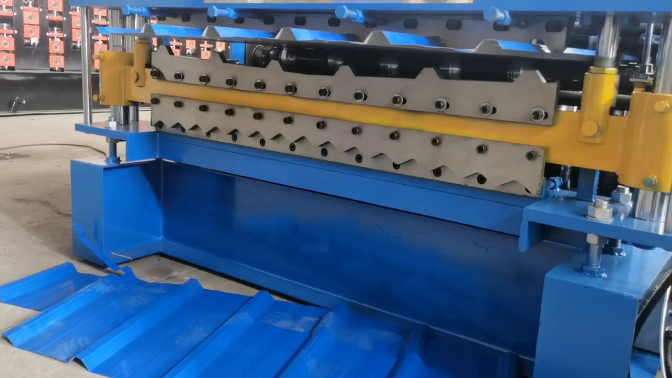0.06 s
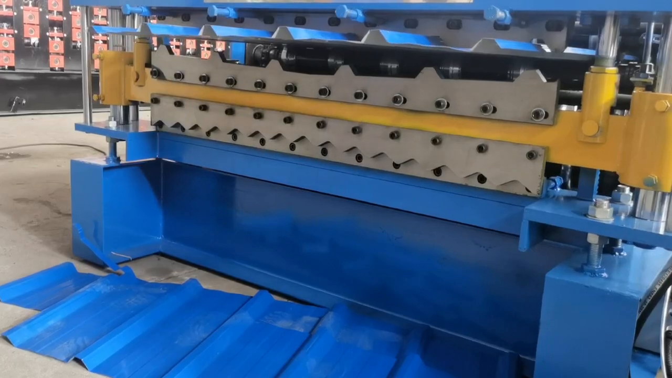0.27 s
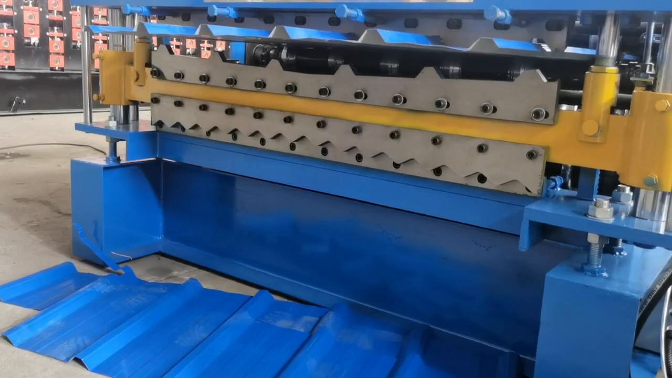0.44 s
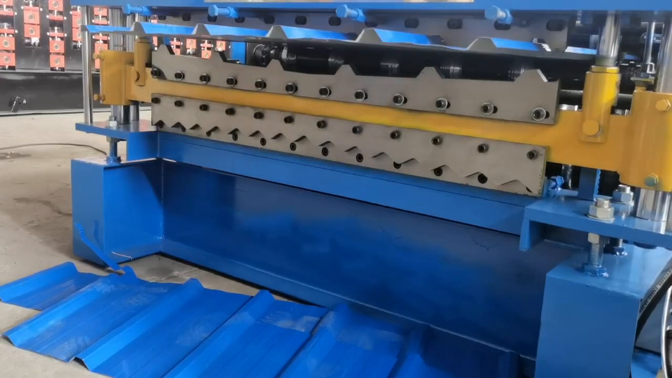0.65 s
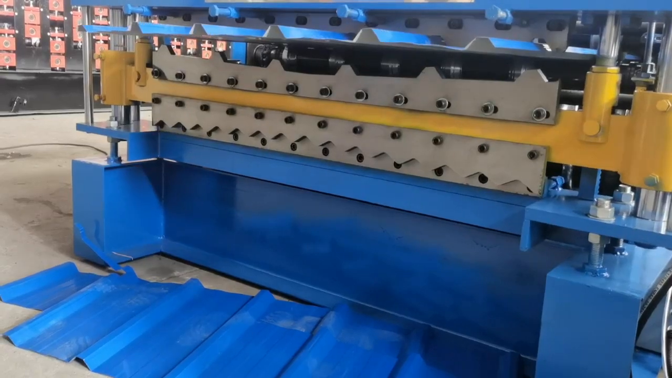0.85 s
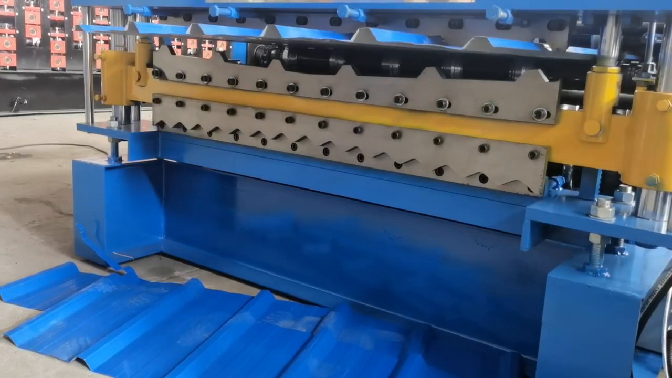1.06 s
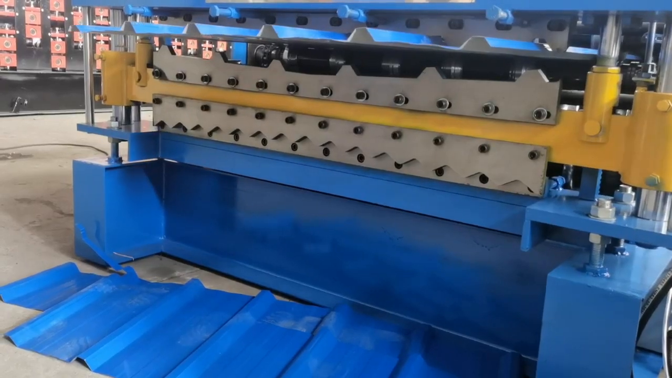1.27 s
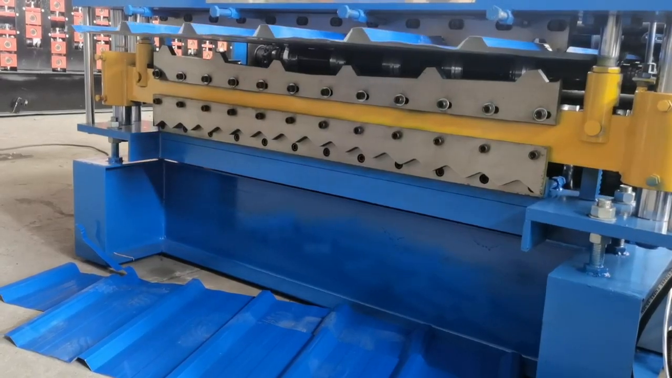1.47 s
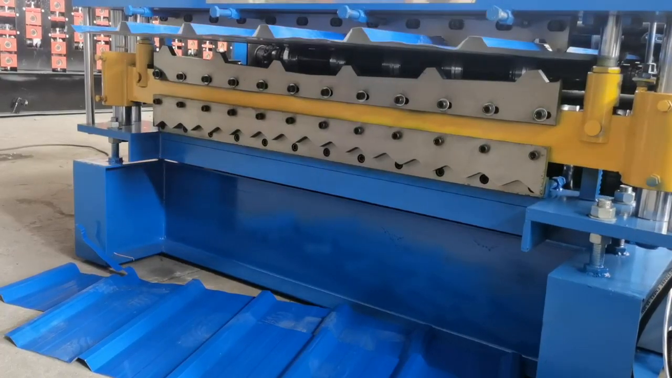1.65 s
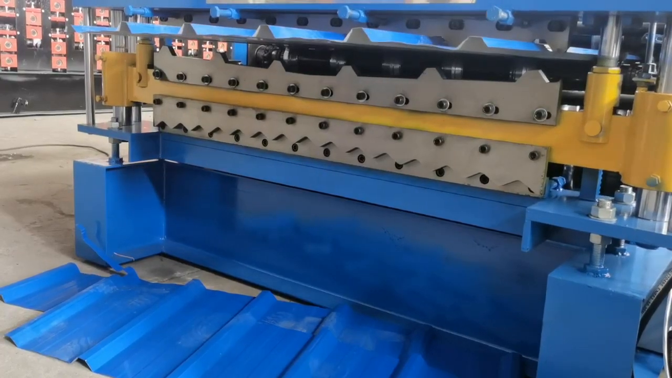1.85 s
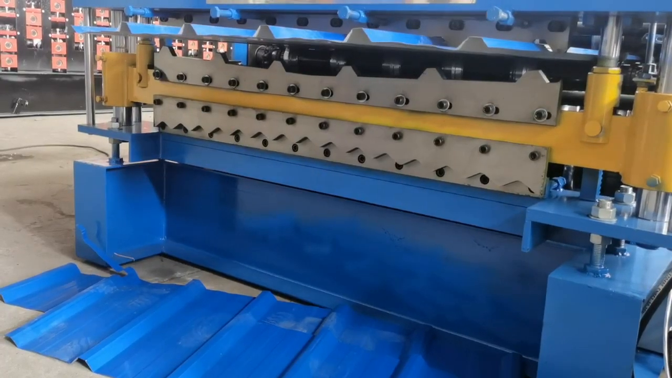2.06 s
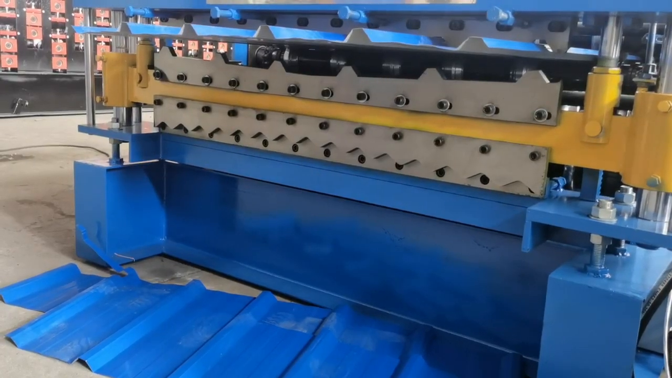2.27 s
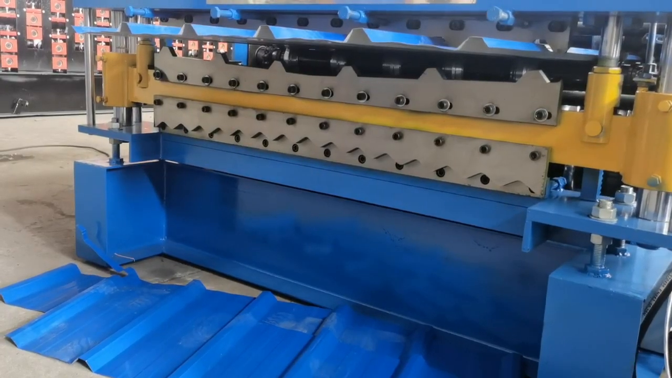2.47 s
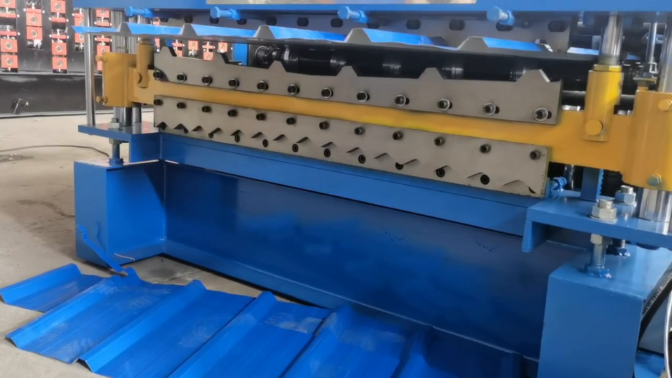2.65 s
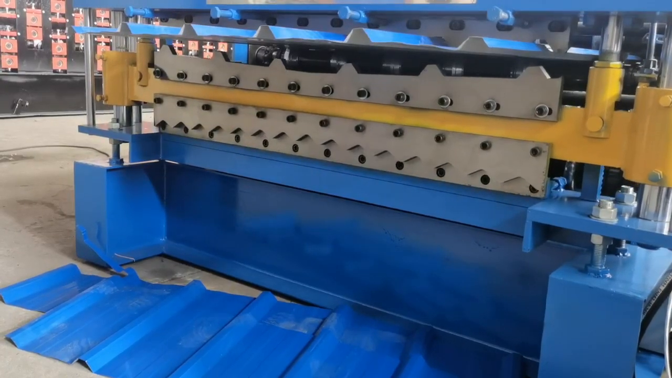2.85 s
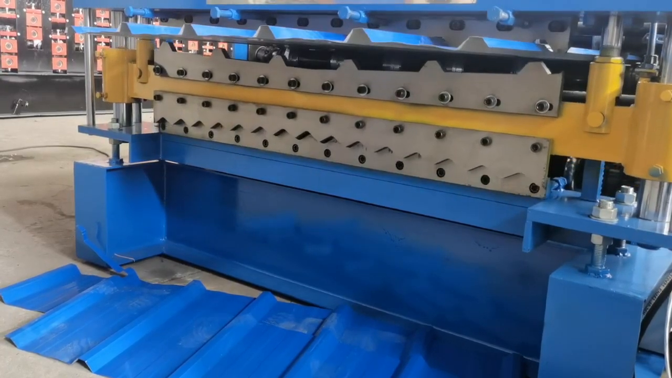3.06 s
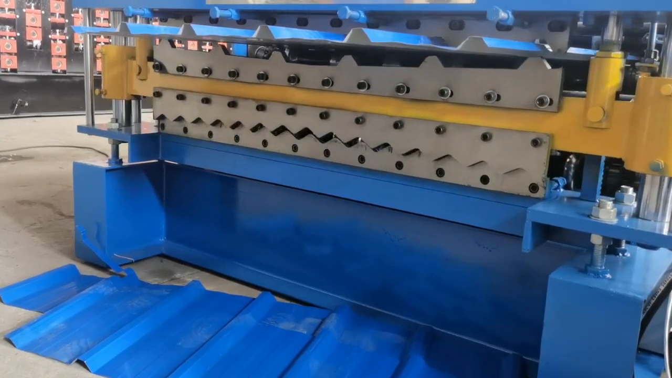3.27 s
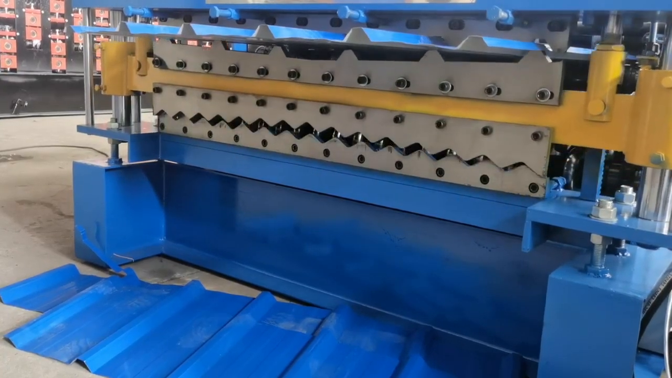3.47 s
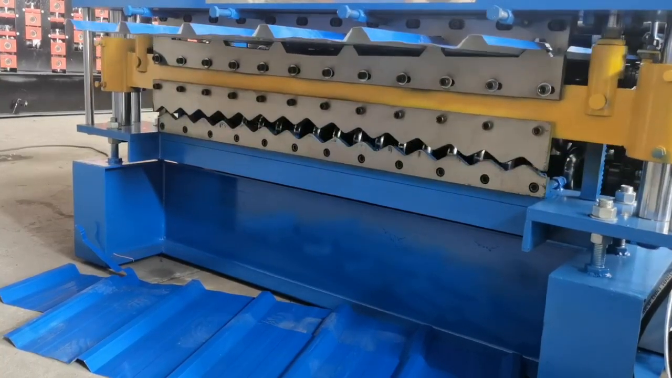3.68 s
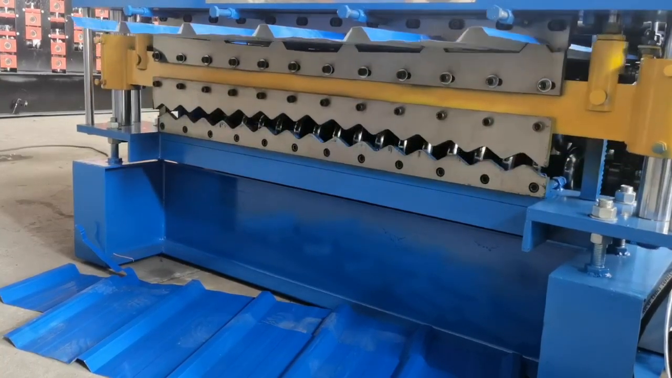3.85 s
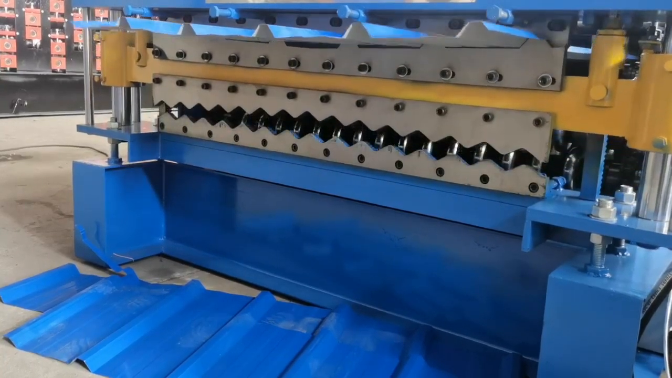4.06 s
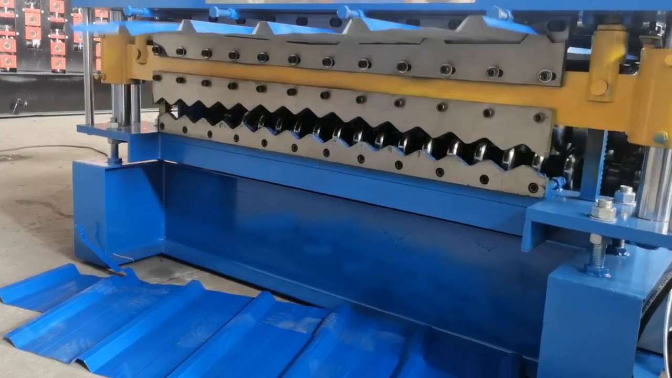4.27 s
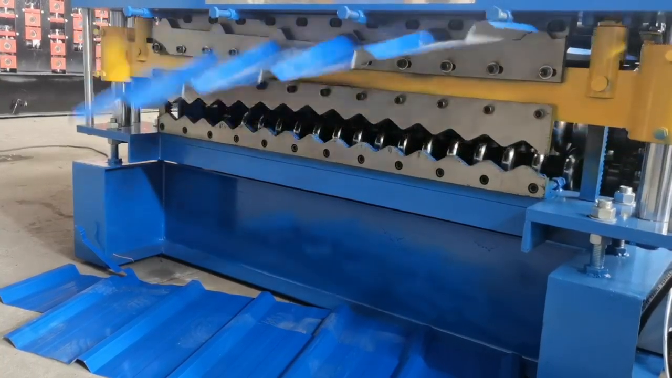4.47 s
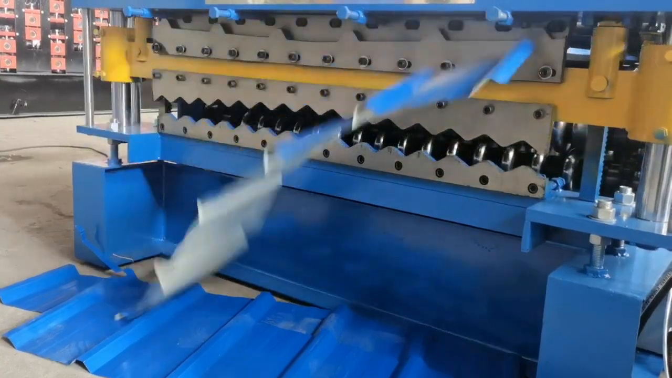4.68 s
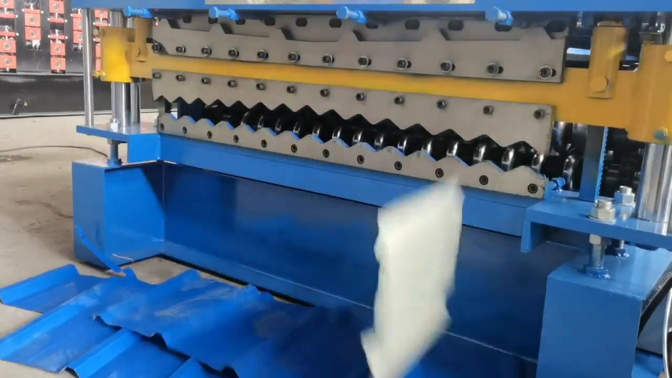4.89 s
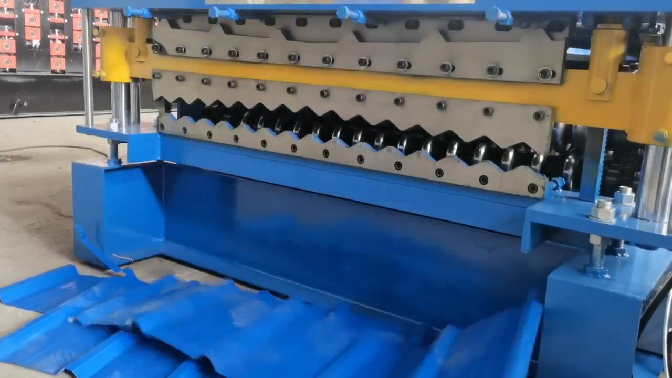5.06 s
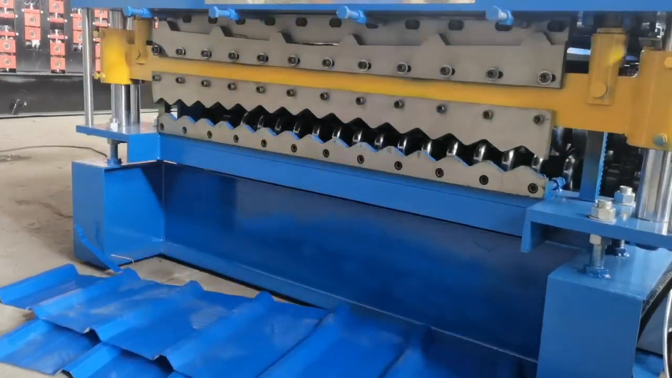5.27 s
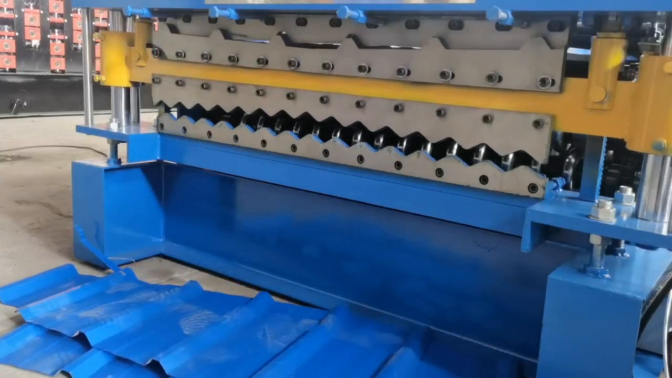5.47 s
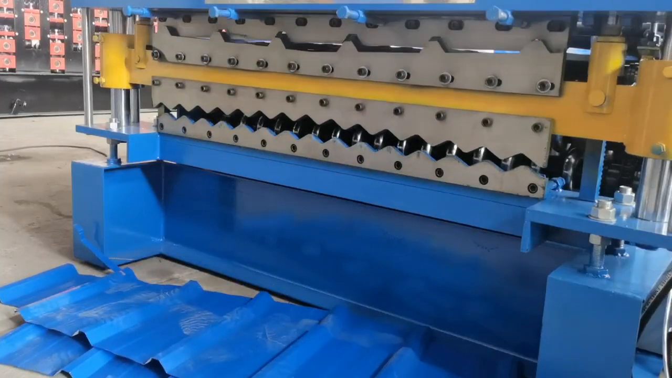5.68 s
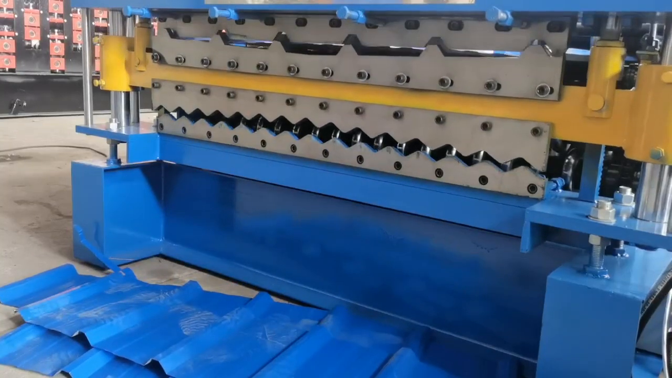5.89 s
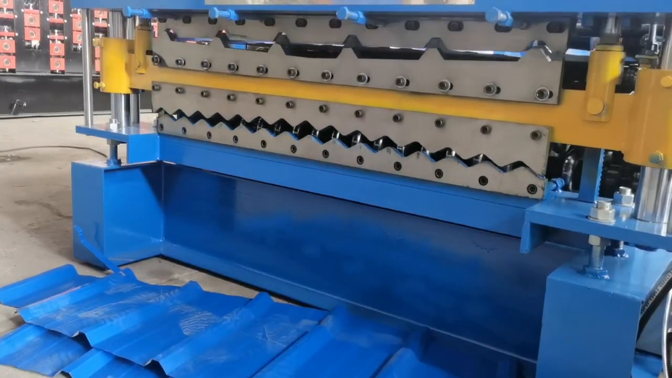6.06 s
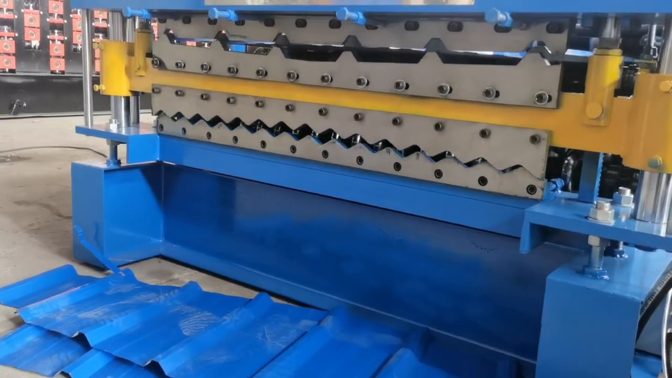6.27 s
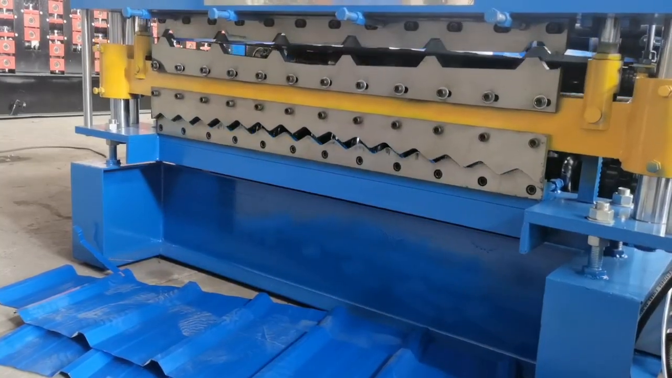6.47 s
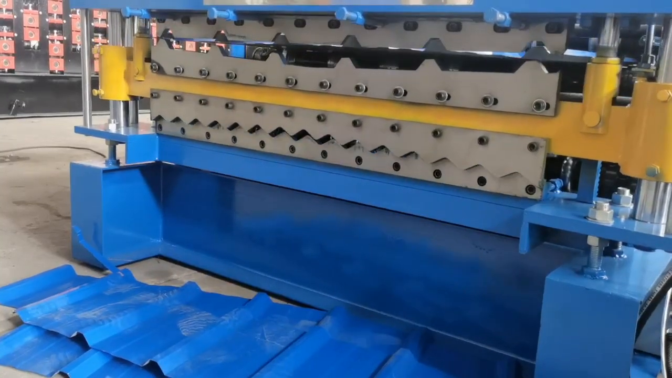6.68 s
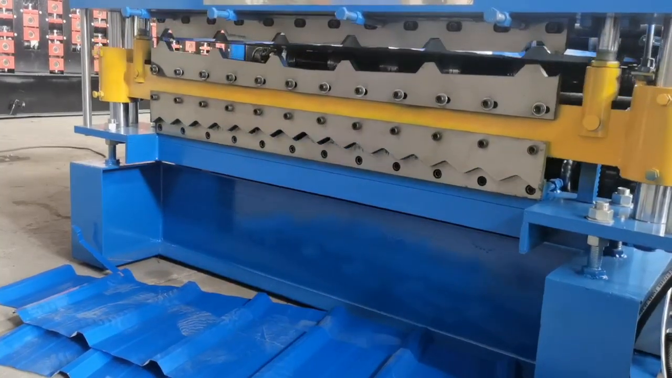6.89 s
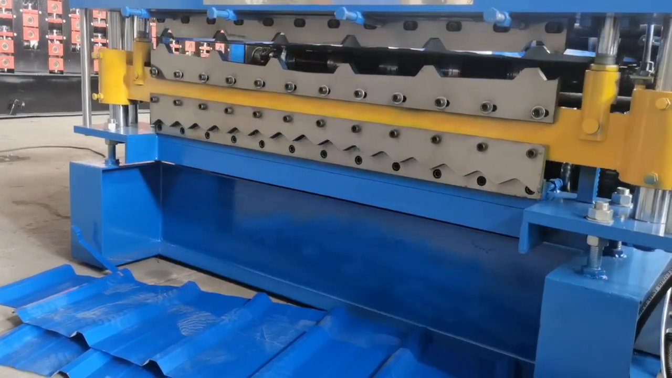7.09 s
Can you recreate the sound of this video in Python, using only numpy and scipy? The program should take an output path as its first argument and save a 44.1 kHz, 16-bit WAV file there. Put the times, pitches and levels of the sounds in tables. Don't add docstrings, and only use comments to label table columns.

```python
import sys
import numpy as np
from scipy import signal
from scipy.fft import rfft, irfft, next_fast_len
from scipy.io import wavfile
from scipy.ndimage import uniform_filter1d, map_coordinates

SR = 44100
rng = np.random.default_rng(int(sys.argv[2]) if len(sys.argv) > 2 else 0)


def wav_record(signal):
    frames = np.transpose(np.atleast_2d(signal))
    bounded = np.clip(frames, -1, 1)
    quanta = np.round(bounded * 32767).astype(np.int16)
    wavfile.write(sys.argv[1], SR, quanta)


def invert_db(level):
    return 10 ** (np.asarray(level, dtype=float) / 20)


N = 314433
TIME = np.arange(N) / SR
VALVE_S, BITE_S, CUT_ENDS_S = 2.328, 2.64, 4.57
FREED_S, FALLS_S, LANDED_S = 3.772, 4.1, 5.239


def rms_one(x):
    return x / np.sqrt(np.mean(x ** 2) + 1e-20)


def in_time(rows):
    s, *columns = np.transpose(rows)
    return [np.interp(TIME, s, c) for c in columns]


def held(start_s, end_s, rise_db_s, fall_db_s):
    rise_db = rise_db_s * (TIME - start_s)
    fall_db = fall_db_s * (end_s - TIME)
    return np.minimum(0, np.minimum(rise_db, fall_db))


def coloured(x, points):
    size = next_fast_len(len(x))
    log_hz = np.log(np.arange(size // 2 + 1) * SR / size + 1)
    hz, db = np.transpose(points)
    gain = invert_db(np.interp(log_hz, np.log(hz), db, left=-90, right=-120))
    return irfft(rfft(x, size) * gain, size)[:len(x)]


def band(x, low_hz, high_hz, order=2):
    return signal.sosfilt(signal.butter(order, [low_hz, high_hz], "band", fs=SR, output="sos"), x)


def resonance(x, hz, width_hz):
    r = np.exp(-np.pi * width_hz / SR)
    poles = [1, -2 * r * np.cos(2 * np.pi * hz / SR), r * r]
    return signal.lfilter([(1 - r * r) / 2, 0, (r * r - 1) / 2], poles, x)


def drift(rate):
    knots = rng.standard_normal(int(N / SR * rate) + 3)
    return map_coordinates(knots, [TIME * rate], order=3)


# pitch_hz [Hz], ring_s [s to fall 60 dB]
HALL_RING = [(200, 1.62), (1000, 0.87), (2500, 1.68), (5000, 0.67), (12000, 0.36)]


def hall(x):
    age, tail = np.arange(int(1.5 * SR)) / SR, 0
    pitch_hz, ring_s = np.transpose(HALL_RING)
    for hz in 125 * 2 ** np.arange(7):
        t60 = np.interp(np.log(hz), np.log(pitch_hz), ring_s)
        tail = tail + band(rng.standard_normal(len(age)), hz, 2 * hz) * invert_db(-60 * age / t60)
    tail *= np.clip(age / 0.015, 0, 1)
    return signal.fftconvolve(x, tail / np.sqrt(np.sum(tail ** 2)))[:N]


# pitch_hz [Hz], level_db [dB per Hz]
FAR_COLOUR = [(150, -12), (220, -10), (330, -3.5), (500, -9.5), (800, -12), (1100, -21), (1500, -42)]


def far_thud():
    start_s, hold_s, level_db = 0.337, 0.21, -44.5
    db = level_db + held(start_s, start_s + hold_s, rise_db_s=500, fall_db_s=23)
    return invert_db(db) * rms_one(coloured(rng.standard_normal(N), FAR_COLOUR))


def drive_whistle():
    whistle_hz, level_db, off_s = 6020.5, -52, 1.42
    turn = 2 * np.pi * whistle_hz * TIME
    tones = np.sin(turn) + invert_db(-30) * (np.sin(2 * turn) + np.sin(1.968 * turn))
    return invert_db(level_db + held(-1, off_s, 1, 220)) * tones


def falling_whine():
    start_s, start_hz, fall_hz_s, level_db, grow_db_s = 6.6, 14000, 6800, -90, 35
    since = np.maximum(TIME - start_s, -.1)
    hz = start_hz - fall_hz_s * since
    db = level_db + grow_db_s * since + held(start_s, 9, 400, 1)
    return invert_db(db + 2.9 * drift(89)) * np.sin(2 * np.pi * np.cumsum(hz + 130 * drift(300)) / SR)


def valve_click():
    level_db, decay_s = -51, .007
    age = np.clip(TIME - VALVE_S, 0, 1)
    hiss = rms_one(band(rng.standard_normal(N), 6500, 13500))
    return invert_db(level_db) * hiss * age / decay_s * np.exp(-age / decay_s)


def idle_level():
    valve_drop_db = -7
    oil = 0.58 + 0.43 * TIME + valve_drop_db * np.clip((TIME - VALVE_S - .03) / 0.069, 0, 1)
    tones = -4.5 + 1.8 * TIME + held(-1, VALVE_S + 0.018, 1, 96)
    return oil + held(-1, BITE_S, 1, 95), tones


# start_s [s], end_s [s], oil_db [dB], tones_db [dB]
STROKES = [
    (2.43, 2.76, 1.4, -1),
    (5.4, 5.95, 3, -1),
    (5.95, 8.0, 0, -1),
]


def stroke_level():
    shapes = []
    for start_s, end_s, oil_db, tones_db in STROKES:
        shapes.append(held(start_s, end_s, 140, 64) + [[oil_db], [tones_db]])
    return np.max(shapes, axis=0)


# time_s [s], level_db [dB re the steady cut]
CUT = [
    (2.62, -35),
    (2.666, -16.5),
    (2.78, -11),
    (2.9, -4),
    (3.3, 0),
    (3.78, 2.5),
    (4.3, 4.5),
    (4.6, -5.5),
    (5.3, -28),
]


def cut_level():
    db = in_time(CUT)[0] + held(CUT[0][0], CUT[-1][0], 500, 500)
    return db, -2.5 + 0.84 * db


# low_db [dB near 55 Hz], high_db [dB near 110 Hz]
HUM = [
    (-52, -52),
    (-55, -49.5),
    (-45, -37),
]
# time_s [s], level_db [dB on the upper hum]
LURCHES = [
    (1.47, 6.5),
    (1.85, -9),
    (2.4, 9.5),
    (2.6, -16),
    (2.8, 6.5),
    (3.43, 8),
    (3.62, -5),
    (3.9, 10),
    (4.08, -2),
]


def rumble():
    follows = (0.14, 1)
    lurch_s = 0.039
    settling = np.where(TIME > BITE_S + 1, 7.5 * np.minimum(TIME - 5.6, 0), stroke_level()[0])
    stop_db = held(0, CUT_ENDS_S, 500, 120)
    gains = []
    for idle, stroke, cut, share in zip(*HUM, follows):
        power = invert_db(2 * (idle + idle_level()[0]))
        power = power + invert_db(2 * (stroke + share ** 2 * settling))
        power = power + invert_db(2 * (cut + share * cut_level()[0] + stop_db))
        gains.append(np.sqrt(power))
    lurch_db = sum(db * np.exp(-((TIME - s) / lurch_s) ** 2) for s, db in LURCHES)
    steady = 1.3 * np.sin(2 * np.pi * np.cumsum(55 + 1.5 * drift(3.98)) / SR)
    low = steady + .6 * rms_one(resonance(resonance(rng.standard_normal(N), 58, 20), 53, 30))
    high = resonance(resonance(rng.standard_normal(N), 111.8, 15.6), 62.0, 71)
    return gains[0] * rms_one(low) + gains[1] * invert_db(lurch_db) * rms_one(high)


def throbbing():
    peak_turn = .5
    tooth, beside = np.divmod(np.arange(300) + 5, 10)
    return 2 * np.pi * (.31 * tooth ** 2 - (beside - 5) * (peak_turn + .37 * (tooth - 6)))


# time_s [s], speed_hz [turns per s]
SHAFT = [
    (0, 24.902),
    (2.36, 24.902),
    (2.5, 24.68),
    (2.7, 24.63),
    (3.05, 24.5),
    (4.6, 24.5),
    (5.3, 24.68),
    (7.13, 24.667),
]


def per_turn(heights, phases):
    size = 8192
    turn = irfft(heights * np.exp(1j * phases), size) * size / 2
    angle = np.cumsum(in_time(SHAFT)[0]) / SR % 1
    return np.interp(angle * size, np.arange(size + 1), np.append(turn, turn[0]))


# start_s [s], end_s [s], level_db [dB]
SINGS = [
    (2.55, 2.86, -53),
    (6.2, 8.0, -64),
]


def stroke_song():
    seventh = np.sqrt(2) * (np.arange(300) == 70)
    level = sum(invert_db(db + held(start_s, end_s, 82, 45)) for start_s, end_s, db in SINGS)
    return level * per_turn(seventh, throbbing())


def pump(orders, casing, level, oil_db, repeat_db, tones_db):
    heights = np.zeros((3, 300))
    for order, db in orders:
        heights[int(order) % 3, int(order)] = np.sqrt(2) * invert_db(db + tones_db)
    tones = sum(per_turn(h, throbbing()) * invert_db(2.14 * drift(6)) for h in heights)
    flaw_heights = rng.rayleigh(1, 300) ** 1.5 * (np.arange(300) > 63)
    flaws = rms_one(per_turn(flaw_heights, 2 * np.pi * rng.random(300)))
    oil = rng.standard_normal(N) * invert_db(.7 * drift(9))
    noise_db, tooth_db = level
    noise = rms_one(coloured(oil + invert_db(repeat_db) * flaws, casing))
    return invert_db(oil_db + noise_db) * noise + invert_db(tooth_db) * tones


# order [multiple of shaft rate], level_db [dB]
IDLE_ORDERS = [(2, -63), (36, -63), (59, -63), (60, -63), (61, -67), (69, -63), (79, -61), (80, -69),
               (81, -68), (83, -66), (87, -66), (99, -64), (102, -63), (109, -60), (118, -62), (120, -58),
               (122, -64), (127, -62), (129, -65), (131, -64), (133, -66), (134, -65), (150, -61),
               (161, -67), (173, -59), (179, -66), (239, -69), (252, -69), (259, -68), (269, -73)]
TRAVEL_ORDERS = [(10, -61), (19, -66), (24, -72), (35, -68), (36, -70), (58, -71), (60, -66), (67, -69),
                 (68, -70), (69, -60.5), (70, -52.5), (71, -70), (72, -71), (79, -64), (80, -68), (90, -64),
                 (91, -66), (99, -63), (100, -64), (104, -65), (107, -65), (109, -67), (110, -66),
                 (116, -70), (120, -60), (121, -71), (129, -69), (170, -74), (181, -75), (189, -78)]
CUT_ORDERS = [(10, -43), (19, -55), (20, -50), (35, -56), (36, -53), (37, -64), (40, -68), (41, -71),
              (49, -69), (50, -63), (60, -52), (61, -59), (62, -62), (67, -56), (68, -50), (69, -47),
              (70, -47), (79, -47), (80, -50), (81, -49), (90, -45), (91, -52), (94, -57), (100, -45),
              (104, -51), (110, -50), (119, -46), (120, -40), (130, -48), (147, -58)]
# pitch_hz [Hz], level_db [dB per Hz]
IDLE_CASING = [(120, -7.5), (220, 2), (800, -9.5), (1210, -15.5), (1600, -9), (1900, -13), (2700, -2.5),
               (3300, -5), (3930, -12.5), (4400, -3.5), (5420, -22), (6430, -13), (8390, -29.5),
               (10700, -31.5), (14000, -42)]
TRAVEL_CASING = [(120, -18), (220, -2.5), (468, -8.5), (876, -10), (1150, -18.5), (1600, -12),
                 (1840, -10.5), (2540, -5.5), (3600, -17), (4400, -17.5), (5100, -27), (6430, -22),
                 (8300, -36.5), (10900, -43), (14000, -55)]
CUT_CASING = [(120, -11), (250, -6), (500, -9), (800, -16), (1330, -20), (1670, -5.5), (1900, -7.5),
              (2700, -0.5), (4000, -11.5), (4400, -6), (5320, -17.5), (6800, -17.5), (8300, -34),
              (10700, -32), (14000, -49)]


def pump_states():
    idle = pump(IDLE_ORDERS, IDLE_CASING, idle_level(), oil_db=-45, repeat_db=-3.5, tones_db=1.6)
    travel = pump(TRAVEL_ORDERS, TRAVEL_CASING, stroke_level(), oil_db=-48.5, repeat_db=-7, tones_db=.8)
    cut = pump(CUT_ORDERS, CUT_CASING, cut_level(), oil_db=-32, repeat_db=-8, tones_db=2.2)
    return idle + travel + cut


# time_s [s], rattle_db [dB], edge_db [dB of the top re the rest]
SHEET = [
    (3.8, -24.5, -5),
    (3.822, -18.5, -13.5),
    (3.87, -21.5, -14),
    (4.02, -20.5, -7),
    (4.348, -19, -16.5),
    (4.638, -16.5, -9.5),
    (4.728, -18, -19.5),
    (4.788, -16, -13.5),
    (5.22, -16.5, -15.5),
]
# level_db [dB re the rattle], ring_out_db_s [dB per s]
SHEET_PARTS = [
    (-8, 13),
    (-14.5, 56),
    (-7, 81),
    (-3.5, 83),
    (1, 100),
]


def sheet_levels():
    rattle_db, edge_db = in_time(SHEET)
    for s, _, knock_db, *_ in SLAPS:
        hush = np.where(TIME < s, np.exp(np.minimum(TIME - s, 0) / 0.024), 0)
        rattle_db = rattle_db - 0.49 * max(knock_db + 14.5, 0) * hush
    own = [held(0, FALLS_S, 1, 22.5), 0, 0, 0, edge_db]
    levels = []
    for (db, fall_db_s), more in zip(SHEET_PARTS, own):
        levels.append(rattle_db + db + more + drift(22) + held(0, LANDED_S, 1, fall_db_s))
    return levels


SHEET_EDGES_HZ = [140, 330, 700, 1700, 5000, 14800]
# pitch_hz [Hz], level_db [dB per Hz]
SHEET_COLOUR = [(76, -14), (130, -6.5), (182, -3.5), (377, -11), (766, -8.5), (1280, -0.5), (1900, -5),
                (2450, 3.5), (3710, -10), (4340, -7), (4980, -14), (6960, -11), (8320, -26), (10700, -20.5),
                (14400, -36.5)]
SHEET_MODES = dict(low_hz=340, high_hz=4600, width_hz=25, db=-3, swell_db=5)


def sheet():
    start = int(FREED_S * SR)
    knocks = invert_db(3.8 * np.minimum(rng.exponential(1, N), 5)) * rng.choice([-1, 1], N)
    knocks *= rng.random(N) < 7000 * invert_db(3 * drift(25)) / SR
    field = coloured(rms_one(knocks) + 1.07 * rng.standard_normal(N), SHEET_COLOUR)[start:]
    field += 0.29 * resonance(field, 2480, 430) + 0.29 * resonance(field, 1240, 210)
    count = 36
    spread = (np.arange(count) + rng.random(count)) / count
    pitches = SHEET_MODES["low_hz"] * (SHEET_MODES["high_hz"] / SHEET_MODES["low_hz"]) ** spread
    swells = SHEET_MODES["db"] + SHEET_MODES["swell_db"] * rng.standard_normal((count, 60))
    steps = np.linspace(0, 59, len(field))
    modes = 0
    for hz, db in zip(pitches, swells):
        drive = field * np.interp(steps, np.arange(60), invert_db(db))
        modes = modes + resonance(drive, hz, SHEET_MODES["width_hz"])
    damped = invert_db(held(0, LANDED_S, 1, 30)[start:])
    plate = 0
    for low, high, db in zip(SHEET_EDGES_HZ, SHEET_EDGES_HZ[1:], sheet_levels()):
        part = rms_one(band(field + damped * modes, low, high, order=4))
        plate = plate + invert_db(db[start:] - 2.5) * part
    gate = np.clip((TIME - FREED_S) / 0.016, 0, 1)
    return gate * np.pad(plate, (start, 0))


# time_s [s], crack_db [peak dB above 5 kHz], knock_db [dB], shudder_db [dB], rib_hz [Hz]
SLAPS = [(3.782, -19.5, -28.5, -22, 4300), (3.806, -20, -13.5, -19, 2340), (3.9175, -11, -15, -11.5, 2920),
         (4.0034, -20, -10, -16, 2300), (4.061, -15.5, -13, -14.5, 3500), (4.073, -28, -13, -26, 1300),
         (4.0906, -27, -17, -26, 2550), (4.171, -17.5, -26, -15, 2550), (4.27, -27, -15.5, -13.5, 1340),
         (4.3805, -37, -17.5, -23, 2470), (4.5149, -15, -10, -38, 2410), (4.6035, -13.5, -6, -18, 1146),
         (4.761, -28, -14, -12.5, 2440), (4.811, -15, -13.5, -16, 1230), (4.8847, -11.5, -18, -38, 2590),
         (4.9954, -17, -9, -23, 2330), (5.11, -30, -16, -18, 1630), (5.1833, -11.5, -12.5, -20, 2340)]


def slaps():
    rib_db, rib_width_hz, rib_rise_s, rib_dies_s = -6, 270, 0.0044, 0.025
    age = np.arange(int(.2 * SR)) / SR
    plate = coloured(rng.standard_normal(N), SHEET_COLOUR)
    bright, dull, low, ribs = np.zeros((4, N))
    for s, crack_db, knock_db, shudder_db, hz in SLAPS:
        at = slice(round(s * SR), round(s * SR) + len(age))
        bright[at] += invert_db(crack_db - 10.5) * (np.exp(-age / 0.012) + 0.24 * np.exp(-age / 0.068))
        dull[at] += invert_db(knock_db - 11.5) * (np.exp(-age / 0.037) + 0.55 * np.exp(-age / 0.0065))
        low[at] += invert_db(shudder_db - 4) * age / 0.025 * np.exp(-age / .022)
        noise = rng.standard_normal(len(age))
        ring = rms_one(resonance(resonance(noise, hz, rib_width_hz), hz, 2 * rib_width_hz))
        ring_shape = np.clip(age / rib_rise_s, 0, 1) * np.exp(-age / rib_dies_s)
        ribs[at] += invert_db(knock_db + rib_db) * ring * ring_shape
    cracks = bright * rms_one(band(plate, 4670, 18000, order=4))
    knocks = dull * rms_one(band(plate, 760, 5400))
    shudders = low * rms_one(band(plate, 327, 795, order=3))
    return cracks + knocks + shudders + ribs


def scene():
    electrics = drive_whistle() + falling_whine() + valve_click()
    machine = rumble() + stroke_song() + pump_states()
    metal = sheet() + slaps()
    return (far_thud() + electrics + machine + metal + invert_db(-12.5) * hall(metal))[None]


def thin_treble(x, valley_db, step_db, from_hz):
    grid = dict(window=np.sqrt(signal.get_window("hann", 2048)), nperseg=2048, noverlap=1024)
    bins = signal.stft(x, **grid)[2]
    power = np.abs(bins) ** 2
    narrow = np.repeat(power[:-1].reshape(128, 8, -1).mean(axis=1), 8, axis=0)
    narrow = np.vstack([narrow, narrow[-1:]])
    wide = uniform_filter1d(power, size=49, axis=0)
    hz = np.arange(len(power))[:, None] * SR / 2048
    luck = np.repeat(rng.standard_normal((129, power.shape[1])), 8, axis=0)[:len(power)]
    in_valley = narrow < wide * invert_db(2 * (valley_db + 1.6 * luck))
    too_small = power < wide * invert_db(2 * step_db)
    dropped = (in_valley | too_small) & (hz > from_hz)
    return signal.istft(bins * ~dropped, **grid)[1][:N]


def top_cut(x):
    return signal.sosfilt(signal.butter(12, 14590, fs=SR, output="sos"), x)


def record(dry):
    rounded = 0.89 * np.tanh(dry / 0.91)
    x = signal.sosfilt(signal.butter(2, 30, "high", fs=SR, output="sos"), rounded)
    x = signal.sosfilt(signal.cheby2(10, 50, 14900, fs=SR, output="sos"), x)
    x = thin_treble(x[0], valley_db=-2.5, step_db=-13.5, from_hz=4690)[None]
    return top_cut(x)


dry = scene()
out = record(dry)
wav_record(out)
```